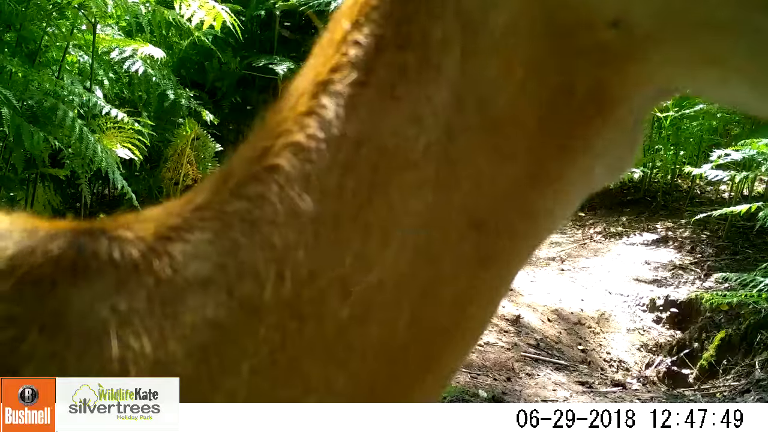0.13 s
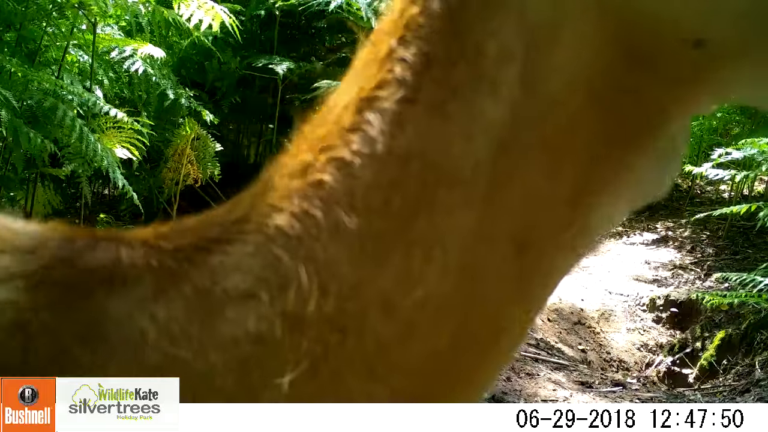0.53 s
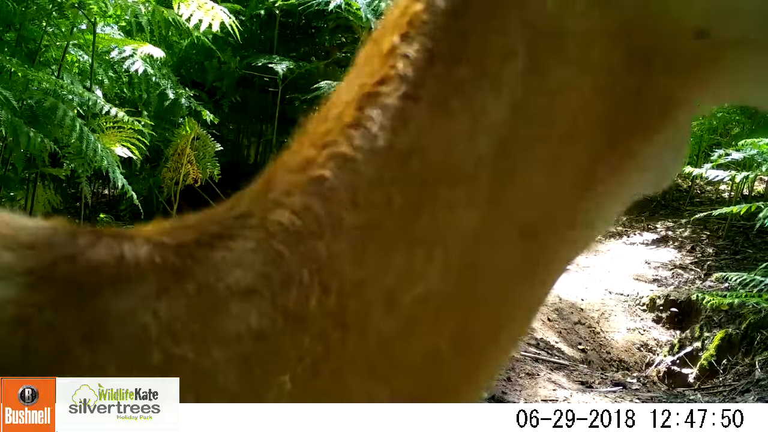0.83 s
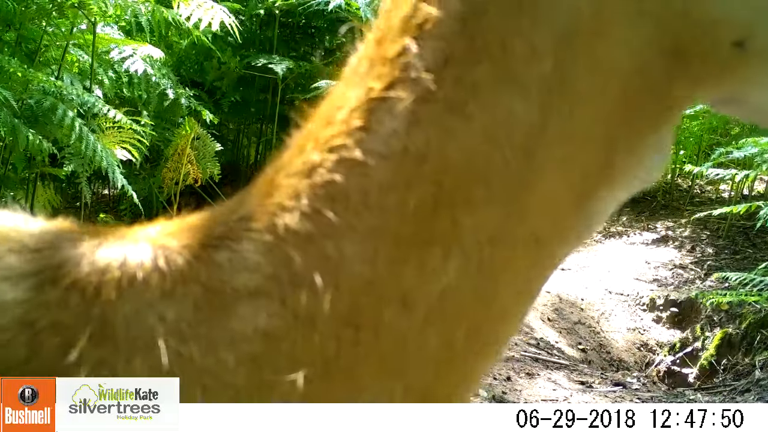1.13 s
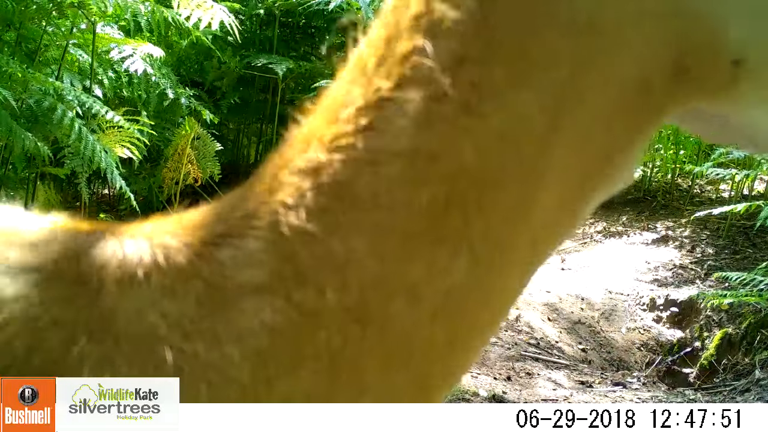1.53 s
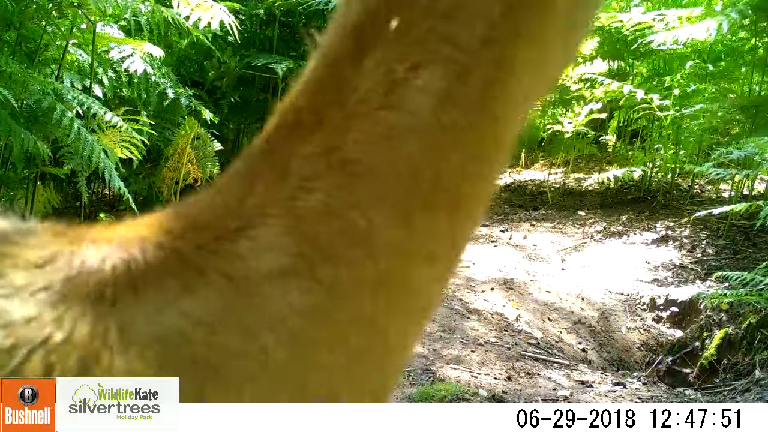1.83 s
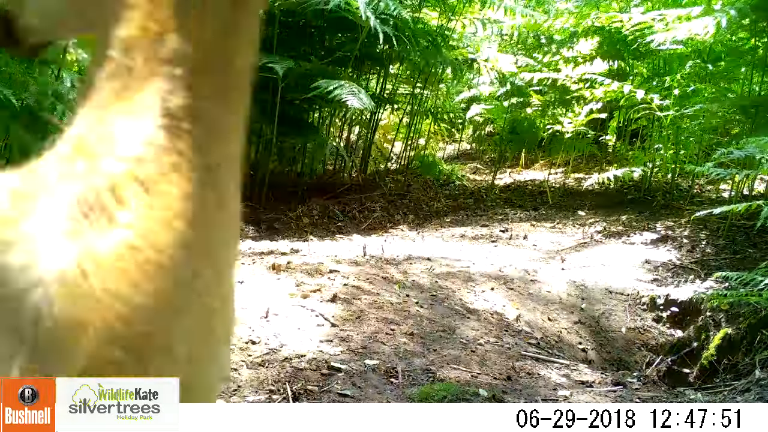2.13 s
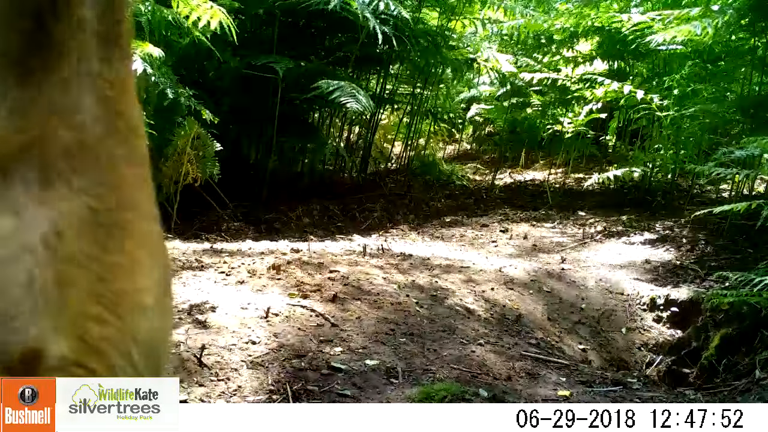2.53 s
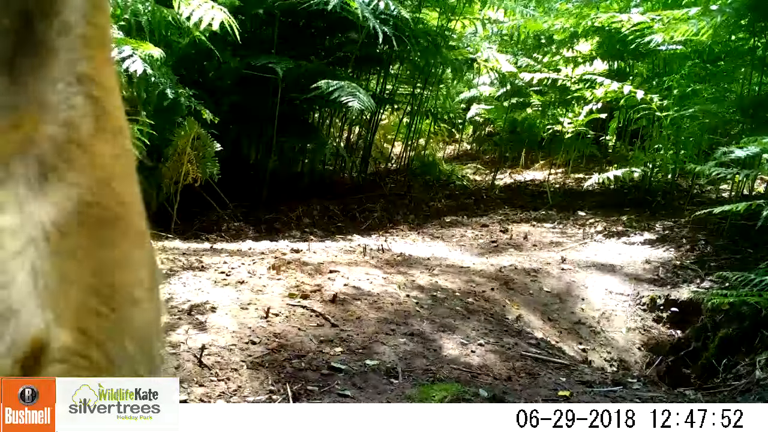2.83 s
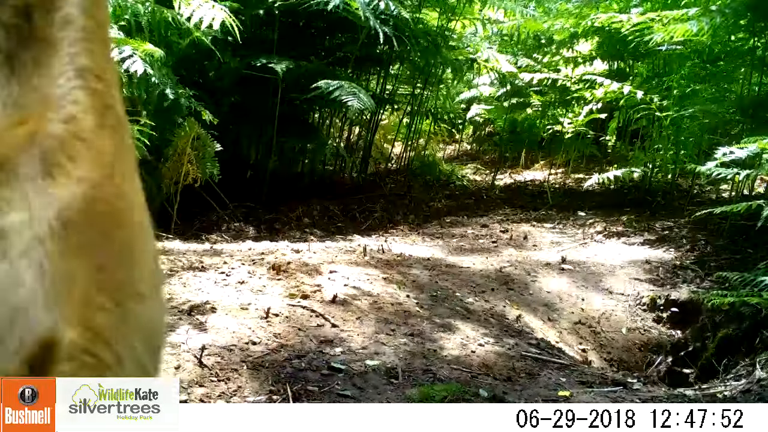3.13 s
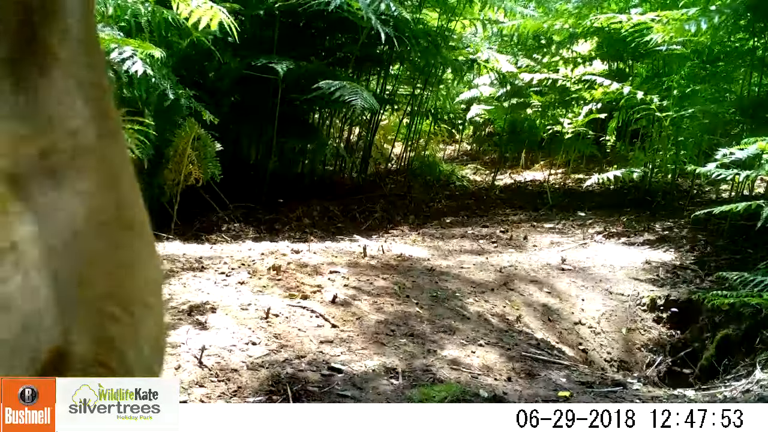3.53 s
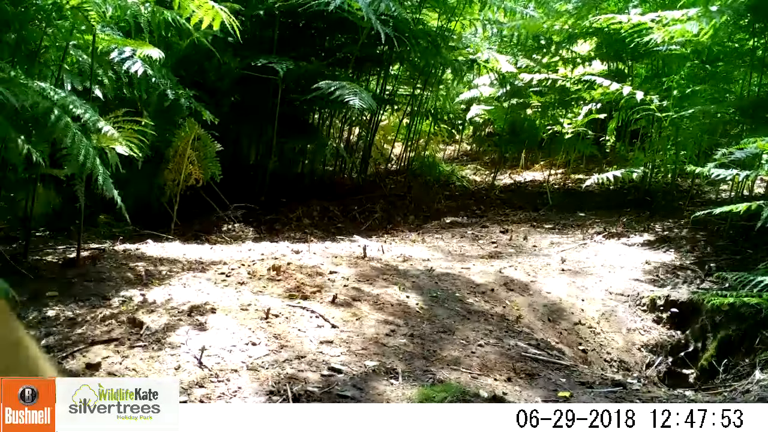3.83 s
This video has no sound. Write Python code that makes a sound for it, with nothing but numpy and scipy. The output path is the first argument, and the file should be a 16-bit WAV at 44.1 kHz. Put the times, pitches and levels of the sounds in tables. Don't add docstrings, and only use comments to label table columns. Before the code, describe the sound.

Low wind thumps and soft leaf hiss fill a quiet wood, with tiny clicks and faint far calls; then a very near deer gives two brief, harsh, nasal bleats about a second apart.

```python
import sys
import numpy as np
from scipy import signal
from scipy.fft import rfft, irfft
from scipy.io import wavfile
from scipy.ndimage import uniform_filter1d

SR = 44100
rng = np.random.default_rng(int(sys.argv[2]) if len(sys.argv) > 2 else 0)


def generate_wav(signal):
    frames = np.transpose(np.atleast_2d(signal))
    scaled = np.clip(frames, -1, 1) * 32767
    pcm = np.round(scaled).astype(np.int16)
    wavfile.write(sys.argv[1], SR, pcm)


def undo_db(level):
    steps = np.asarray(level, float) / 20
    return 10 ** steps


N = 176400

# (time [s], pitch [Hz], chest level [dB])
FIRST_SQUEAL_FOLDS = [(2.548, 751, -37), (2.556, 729, -27), (2.577, 663, -45), (2.6, 579, -32),
                      (2.609, 546.5, -23), (2.62, 477.6, -18), (2.628, 463, -25)]
FIRST_BLEAT_FOLDS = [(2.662, 454.5, -18.5), (2.71, 469, -19), (2.722, 466, -18), (2.752, 402.3, -21),
                     (2.766, 374, -26.5), (2.79, 370, -74)]
SECOND_SQUEAL_FOLDS = [(3.583, 678, -42), (3.595, 619, -42), (3.606, 616, -38), (3.62, 549.4, -28.5),
                       (3.634, 524, -21)]
SECOND_BLEAT_FOLDS = [(3.647, 474, -16), (3.687, 466, -13), (3.74, 468, -20), (3.771, 460.7, -19.5),
                      (3.787, 442.3, -19.5), (3.821, 371, -27.5), (3.85, 380, -57)]
# (time [s], centre [Hz], level [dB])
FIRST_SQUEAL_MOUTH = [
    [(2.548, 2200, -52), (2.562, 2170, -38), (2.602, 1770, -33), (2.622, 1850, -45), (2.658, 1870, -46)],
    [(2.548, 2950, -47), (2.56, 2900, -28), (2.572, 3230, -15), (2.598, 2770, -24.5), (2.61, 2900, -33.5),
     (2.658, 2780, -45)],
    [(2.548, 4300, -43), (2.57, 4570, -26), (2.584, 3830, -25), (2.602, 3500, -28), (2.61, 3500, -31),
     (2.62, 4000, -25), (2.628, 3700, -45), (2.658, 3680, -38)],
    [(2.548, 5800, -48), (2.574, 5970, -26), (2.586, 4930, -23), (2.602, 4700, -25.5), (2.614, 5000, -29),
     (2.622, 4300, -33), (2.658, 4600, -54)],
    [(2.555, 9670, -70), (2.57, 9300, -53), (2.585, 8400, -56), (2.604, 8700, -49), (2.612, 11500, -53),
     (2.622, 8800, -75), (2.658, 8000, -75)],
]
FIRST_BLEAT_MOUTH = [
    [(2.663, 1850, -23), (2.724, 1850, -27.5), (2.745, 1760, -22), (2.754, 1660, -31.5), (2.765, 1500, -62)],
    [(2.663, 2550, -16.5), (2.68, 3120, -19), (2.69, 2950, -13), (2.705, 2960, -25), (2.72, 3250, -27),
     (2.732, 3200, -35), (2.744, 3340, -21), (2.76, 3370, -33), (2.775, 3350, -56)],
    [(2.663, 3500, -31), (2.675, 3920, -22.5), (2.684, 4200, -22), (2.694, 4570, -29), (2.703, 4630, -13.5),
     (2.722, 4460, -14), (2.734, 4500, -33), (2.745, 4700, -27), (2.77, 4560, -56)],
    [(2.663, 4900, -31), (2.68, 4900, -29), (2.69, 5270, -50), (2.722, 6070, -26.5), (2.735, 5970, -36),
     (2.76, 4700, -36), (2.775, 4770, -57)],
    [(2.663, 7850, -47), (2.68, 7000, -44), (2.7, 7450, -36), (2.726, 8300, -46), (2.76, 7000, -65)],
]
SECOND_SQUEAL_MOUTH = [
    [(3.583, 2000, -37), (3.59, 2000, -40), (3.615, 1900, -31), (3.641, 2100, -41)],
    [(3.586, 2940, -26), (3.594, 3020, -25.5), (3.605, 3060, -27), (3.612, 3000, -31), (3.62, 3230, -24),
     (3.629, 3300, -32), (3.64, 3300, -41)],
    [(3.586, 4300, -52), (3.595, 4400, -33), (3.604, 4240, -32), (3.612, 4200, -42), (3.628, 3750, -39),
     (3.638, 3700, -39)],
    [(3.586, 5300, -39), (3.603, 5000, -29), (3.613, 4800, -36), (3.638, 4700, -38)],
    [(3.586, 8700, -75), (3.6, 8700, -55), (3.613, 8700, -72), (3.638, 7000, -75)],
]
SECOND_BLEAT_MOUTH = [
    [(3.645, 2410, -13.5), (3.652, 2420, -13), (3.66, 2350, -26), (3.668, 2340, -16.5), (3.71, 2240, -9.5),
     (3.73, 2270, -18), (3.75, 2130, -28), (3.795, 1740, -31), (3.835, 1520, -48)],
    [(3.644, 3040, -24), (3.658, 3210, -6.5), (3.674, 2790, -13), (3.692, 2870, -21), (3.708, 3170, -26),
     (3.747, 3376, -11), (3.77, 3300, -20.5), (3.796, 3050, -24), (3.815, 2820, -56)],
    [(3.644, 4330, -23), (3.654, 4310, -17), (3.668, 4240, -20.5), (3.682, 3830, -16), (3.74, 3630, -21.5),
     (3.785, 3500, -32), (3.82, 3500, -65)],
    [(3.644, 5350, -32), (3.66, 6230, -25.5), (3.698, 5630, -29), (3.715, 4640, -28), (3.745, 5080, -21),
     (3.758, 5000, -25), (3.775, 5940, -40), (3.81, 5700, -42), (3.835, 5700, -62)],
    [(3.644, 7000, -39), (3.655, 8600, -37), (3.685, 8700, -30), (3.7, 7240, -36), (3.72, 6700, -35),
     (3.75, 7500, -42), (3.785, 6800, -42), (3.82, 6500, -60)],
]
MOUTH_WIDTHS = [420, 520, 500, 716, 1300]
# (centre [Hz], width [Hz], level [dB])
NOSE_CAVITIES = [(1380, 800, -18.5), (11000, 4700, -39.5)]
# (time [s], level [dB], ring [Hz])
CHEST_RINGS = [
    (2.766, -20.5, 450),
    (3.823, -24, 460),
]
# (time [s], peak level [dB], ring [Hz])
TWIGS = [(0.422, -44, 9550), (0.5761, -49, 9500), (0.7348, -48, 9500), (1.8253, -30.5, 9400),
         (2.4419, -49, 9500), (3.7894, -40, 10500), (3.8214, -44, 13000), (3.92, -38, 11500)]
# (time [s], length [s], level [dB], top pitch [Hz], brightness [0 to 1])
FAR_CALLS = [(3.198, .12, -41, 870, 1), (.75, .26, -45, 800, 0), (.9, .17, -47, 895, 0),
             (.74, .17, -47, 585, 0), (1.42, .08, -49, 820, 1), (1.88, .24, -46, 705, 0)]
# (frequency [Hz], level [dB])
FAR_TONE = [(800, -2), (1700, -8), (2500, -12), (3300, -11), (4000, 1), (5000, -14)]
# (time [s], buffet level [dB])
GUSTS = [(0.07, -34), (0.36, -34.5), (0.44, -27), (0.47, -38.5), (0.85, -16.5), (1.03, -35), (1.19, -20.5),
         (1.38, -34), (1.59, -29), (1.65, -21), (1.7, -32), (2.13, -25), (2.17, -32), (2.28, -16),
         (2.52, -35), (3.51, -34), (3.59, -19), (4.0, -31)]
# (frequency [Hz], density [dB per Hz])
BUFFET_TONE = [(8, -17), (24, -5.5), (41, 11), (56, -5.5), (90, -21), (200, -26), (1000, -53), (16000, -63)]
LEAF_TONE = [(29, -3.5), (50, -5), (79, -3), (277, -15), (461, -18.5), (586, -21), (2950, -37.5),
             (5020, -32), (16000, -61.5)]
HISS_TONE = [(1500, -11), (3000, -13), (4000, -3.5), (5200, -1), (6500, -9), (9000, -28)]
# (frequency [Hz], density [dB per Hz])
ENGINE_TONE = [(150, -37), (168, -10), (176, 5), (184, -15), (200, -61), (400, -90)]
RUMBLE_TONE = [(70, -33), (120, 1.5), (220, -2), (400, -23), (1500, -64)]


def read(points, hz):
    f, value = np.transpose(points)
    return np.interp(np.log(hz + 1), np.log(f + 1), value)


def evened(x):
    return x / np.sqrt(np.mean(abs(x) ** 2) + 1e-20)


def add(mix, s, sound):
    part = mix[round(s * SR):][:len(sound)]
    part += sound[:len(part)]


def slow(shape, s):
    span = max(int(s * SR), 2)
    drift = uniform_filter1d(rng.standard_normal(shape), span)
    return evened(uniform_filter1d(drift, span))


def cavity(f, hz, width):
    return (width * f / (width * f + 1j * (f ** 2 - hz ** 2))) ** 2


def bleat(squeal_folds, bleat_folds, squeal_mouth, bleat_mouth):
    burst_s = bleat_mouth[0][0][0]
    folds = np.transpose(squeal_folds + bleat_folds)
    tracks = [first + then for first, then in zip(squeal_mouth, bleat_mouth)]
    t = np.arange(folds[0, 0], folds[0, -1], 1 / SR)
    pitch, chest_db = (np.interp(t, folds[0], column) for column in folds[1:])
    pitch = uniform_filter1d(pitch, 200) * (1 + 0.0012 * slow(len(t), 0.0052))
    k = np.arange(1, 34)[:, None]
    f = k * pitch
    turn = np.exp(2j * np.pi * k * np.cumsum(pitch) / SR)

    tract, opening = 0, 0
    for i, (track, width) in enumerate(zip(tracks, MOUTH_WIDTHS)):
        s, centre, db = np.transpose(track)
        gain = undo_db(np.interp(t, s, db))
        tract = tract + (-1) ** i * gain * cavity(f, np.interp(t, s, centre), width)
        opening = opening + gain
    nose = sum((-1) ** i * undo_db(db) * cavity(f, hz, width)
               for i, (hz, width, db) in enumerate(NOSE_CAVITIES))
    tract = tract + opening ** 1.78 * nose

    rasp_db = 13 * np.exp(-abs(t - burst_s) / 0.02)
    break_db = 10 * np.exp(-((t - burst_s + 0.05) / 0.012) ** 2)
    breath = undo_db(-25 + rasp_db + break_db) * np.minimum(f, 5500) / 3500
    breath = breath * (slow(f.shape, 0.00043) + 1j * slow(f.shape, 0.0004))
    wander = undo_db(1.6 * np.minimum(f, 7000) / 2500 * slow(f.shape, 0.006))
    overtones = tract * wander * (1 + breath) * turn * (f < 16000)
    bright = overtones[1:].sum(0)

    second_db, third_db = -11, -25
    chest = turn[0] + undo_db(second_db) * turn[1] + undo_db(third_db) * turn[2]
    edge = np.minimum(np.minimum(t - t[0], t[-1] - t) / 0.0038, 1)
    return t[0], np.sqrt(2) * edge * (undo_db(chest_db) * chest + bright).real


def chest_ring(s, db, hz):
    ring_s = 0.0061
    u = np.arange(0, 6, 1 / (SR * ring_s))
    swell = 2 * u * np.exp(-u ** 2 / 2)
    return s, undo_db(db) * swell * np.sin(2 * np.pi * hz * ring_s * u)


def twig(s, peak_db, ring_hz):
    snap_s, crack_hz = 0.00034, 8500
    t = np.arange(-3, 5, 1 / (SR * snap_s))
    crack = 1.6 * np.cos(2 * np.pi * crack_hz * snap_s * t) * np.exp(-45 * t ** 2)
    grit = evened(np.diff(rng.standard_normal(400)))[:len(t)]
    snap = np.cos(2 * np.pi * ring_hz * snap_s * t) + 0.3 * grit
    return s - 3 * snap_s, undo_db(peak_db) * (snap * np.exp(-t ** 2 / 2) + crack)


def far_bleat(start, length, level_db, top_hz, bright):
    u = np.arange(0, 1, 1 / (SR * length))
    sag = 0.13 * (1.15 * bright - 0.05) * u ** 0.5
    f = np.arange(1, 7)[:, None] * top_hz * (1 - sag)
    level = read(FAR_TONE, f) - 30 * (1 - bright) * (f > 1000)
    level = level + 3 * slow(f.shape, 0.015)
    lines = undo_db(level) * np.sin(2 * np.pi * np.cumsum(f, 1) / SR)
    return start, undo_db(level_db) * np.sin(np.pi * u ** 0.5) ** 0.7 * lines.sum(0)


def woods(x):
    echo_db, t60_s, first_s = -19.5, 0.16, 0.012
    t = np.arange(SR // 2) / SR
    tail = rng.standard_normal(len(t)) * undo_db(-60 * t / t60_s) * (t > first_s)
    return undo_db(echo_db) * signal.fftconvolve(x, tail / np.linalg.norm(tail))[:N]


def noise(tone, patchy_db):
    frames = N // 256 + 5
    length = frames * 256
    patches = uniform_filter1d(rng.standard_normal((513, frames)), 14, 0)
    patches = evened(uniform_filter1d(patches, 12, 1))
    colour = undo_db(read(tone, np.fft.rfftfreq(length, 1 / SR)))
    steady = irfft(rfft(rng.standard_normal(length)) * colour)
    z = signal.stft(steady, nperseg=1024, noverlap=768)[2]
    z = z[:, :frames] * undo_db(patchy_db * patches)
    return evened(signal.istft(z, nperseg=1024, noverlap=768)[1][:N])


def wind():
    t = np.arange(N) / SR
    gust_db = np.interp(t, *np.transpose(GUSTS))
    buffet = noise(BUFFET_TONE, 0)
    buffet = buffet / (0.2 + uniform_filter1d(abs(buffet), 2500))
    rustle = undo_db(-31.5) * noise(LEAF_TONE, 0.8)
    hiss_db = -43 + 2 * (t - 3.5)
    return undo_db(gust_db) * evened(buffet) + rustle + undo_db(hiss_db) * noise(HISS_TONE, 1.2)


def far_engine():
    t = np.arange(N) / SR
    peak_s, spread_s = 1.96, 0.31
    swell = undo_db(-36.5) * np.exp(-((t - peak_s) / spread_s) ** 2 / 2)
    rumble = swell * noise(RUMBLE_TONE, 1.1)
    hum_db = -47.5 + (t - 2)
    return undo_db(hum_db) * noise(ENGINE_TONE, 0.68) + rumble


def scene():
    calls = np.zeros(N)
    add(calls, *bleat(FIRST_SQUEAL_FOLDS, FIRST_BLEAT_FOLDS, FIRST_SQUEAL_MOUTH, FIRST_BLEAT_MOUTH))
    add(calls, *bleat(SECOND_SQUEAL_FOLDS, SECOND_BLEAT_FOLDS,
                      SECOND_SQUEAL_MOUTH, SECOND_BLEAT_MOUTH))
    for source, events in ((chest_ring, CHEST_RINGS), (far_bleat, FAR_CALLS), (twig, TWIGS)):
        for event in events:
            add(calls, *source(*event))
    return (calls + woods(calls) + wind() + far_engine())[None]


def low_pass(x):
    return signal.sosfilt(signal.butter(12, 16670, fs=SR, output="sos"), x)


def record(dry):
    on_s, step, settle_s = 0.0595, -0.19, 0.12
    ceiling, knee, edge_hz = 0.5, 17, 15820
    t = np.arange(N) / SR - on_s
    self_noise = undo_db(-60) * rng.standard_normal(N)
    x = dry + self_noise + step * np.exp(-abs(t) / settle_s)
    x = x / (1 + abs(x / ceiling) ** knee) ** (1 / knee)
    lowpass = signal.firwin(1023, edge_hz, window=("kaiser", 9), fs=SR)
    x = signal.oaconvolve(x, lowpass[None], "same")
    return low_pass(x * (t >= 0))


dry = scene()
out = record(dry)
generate_wav(out)
```